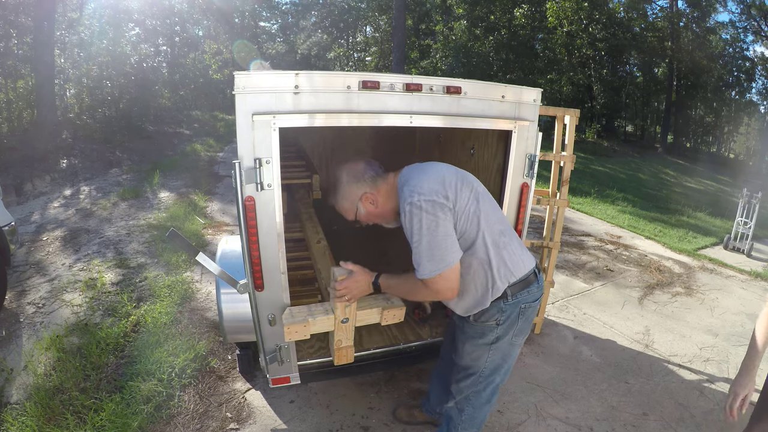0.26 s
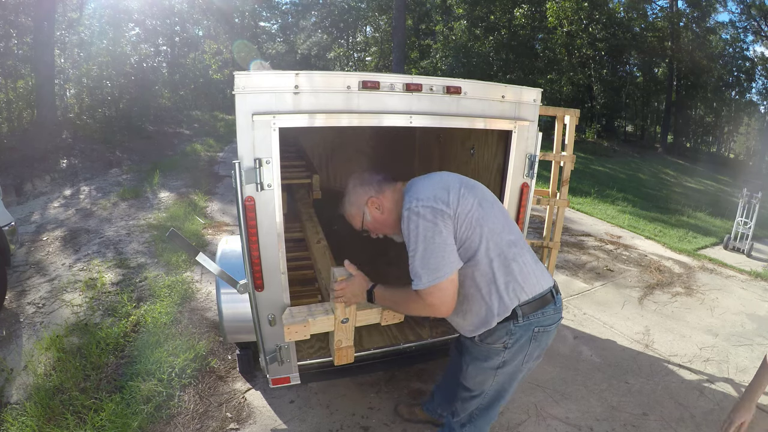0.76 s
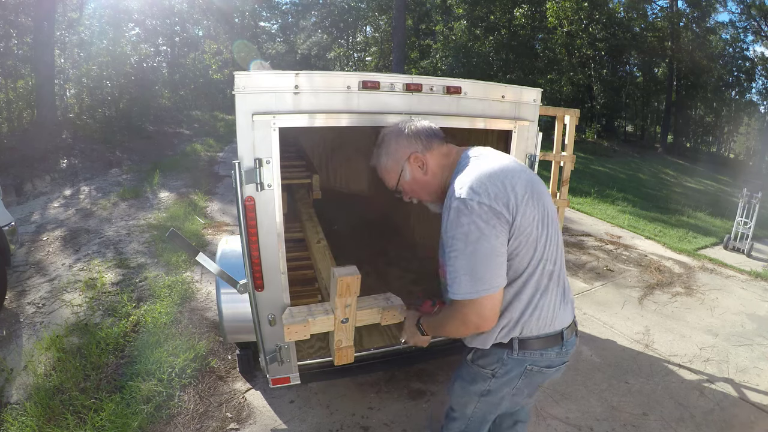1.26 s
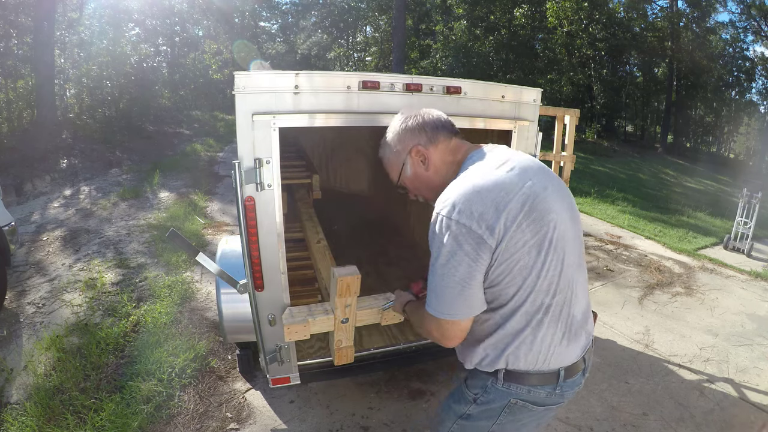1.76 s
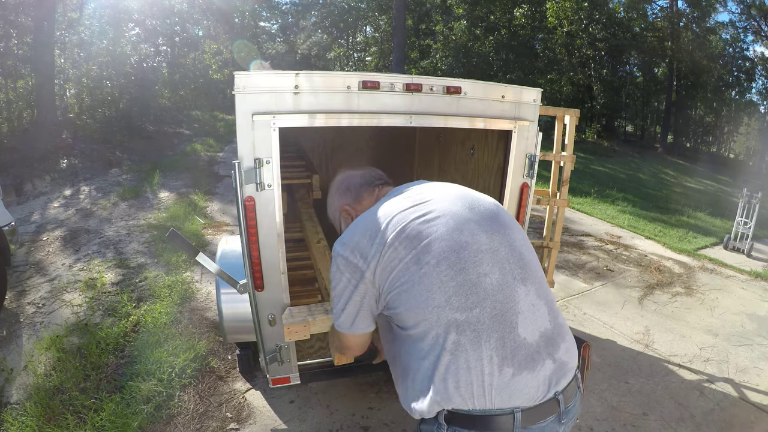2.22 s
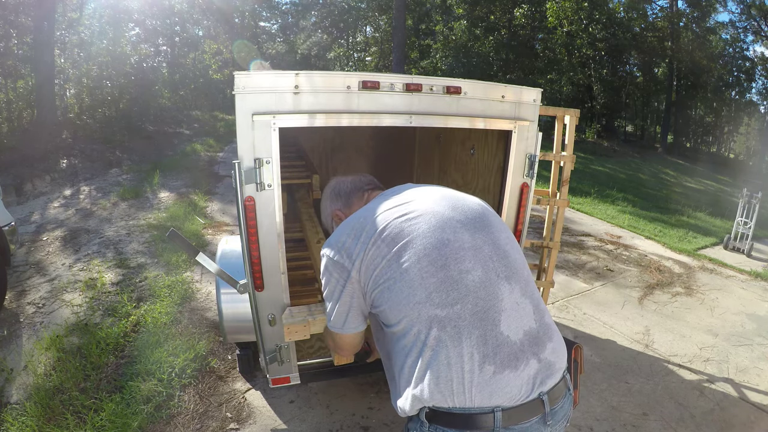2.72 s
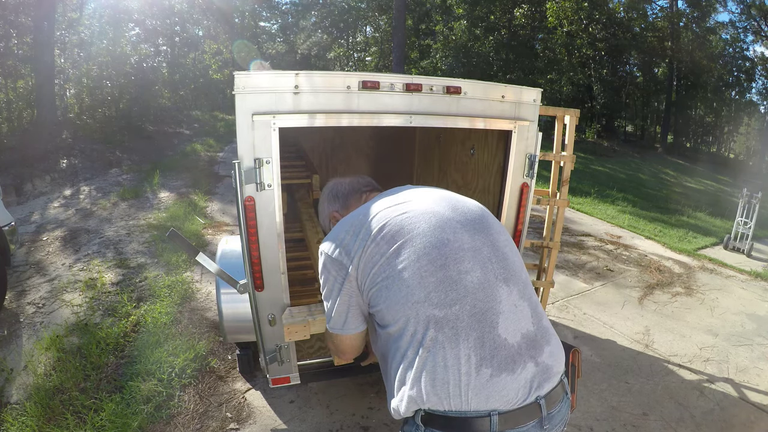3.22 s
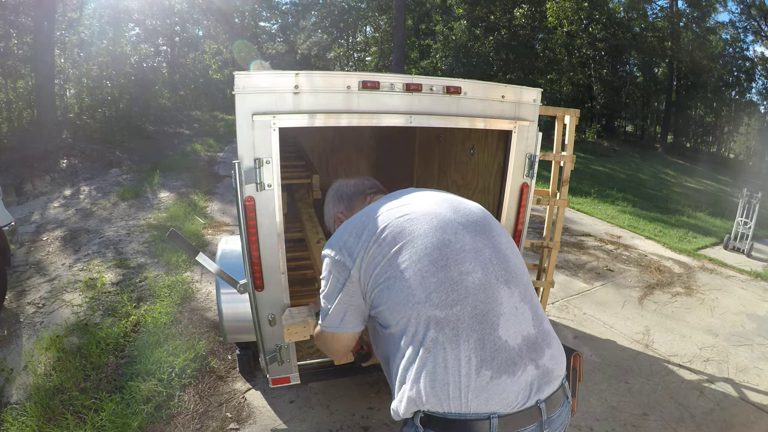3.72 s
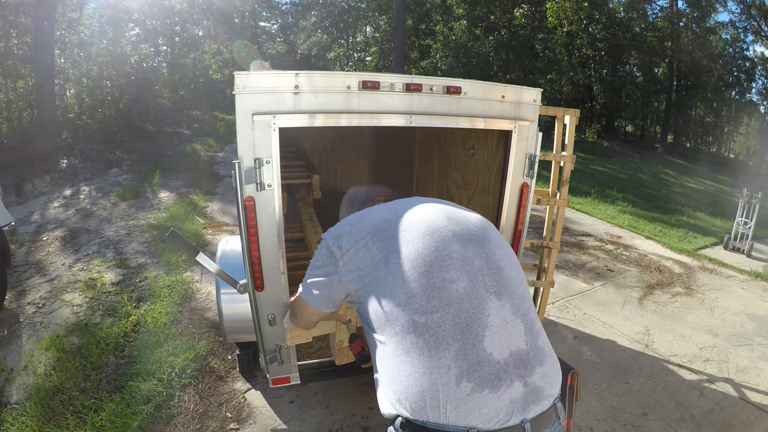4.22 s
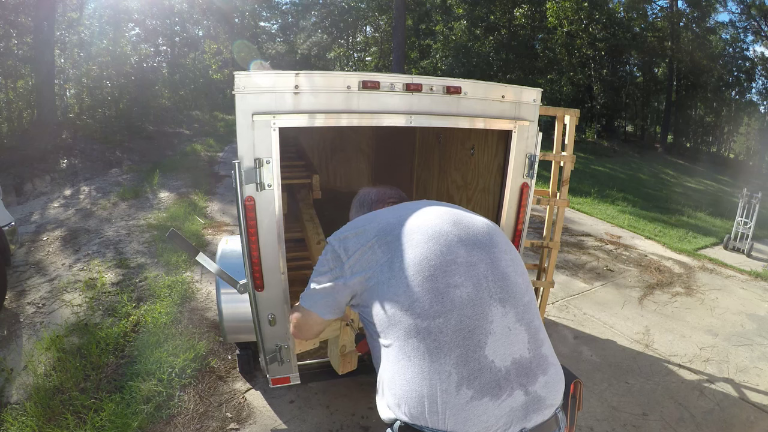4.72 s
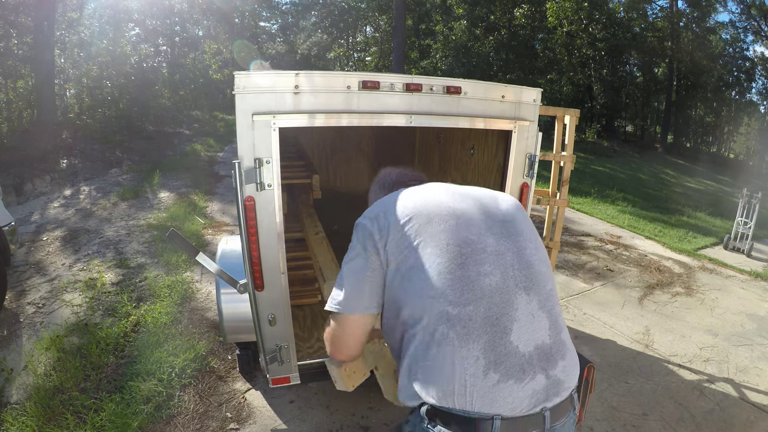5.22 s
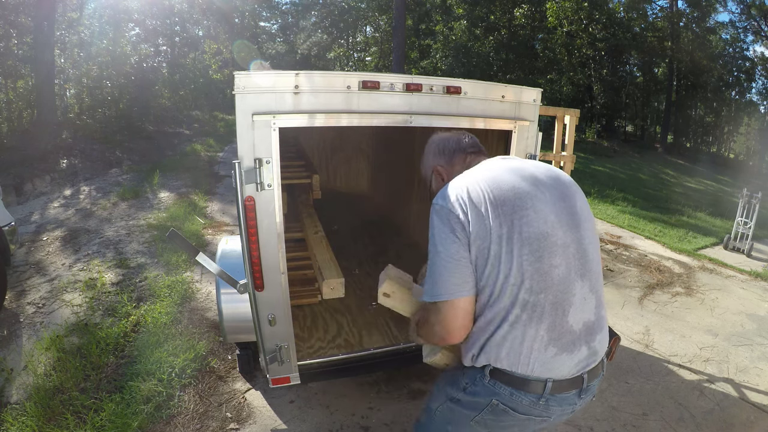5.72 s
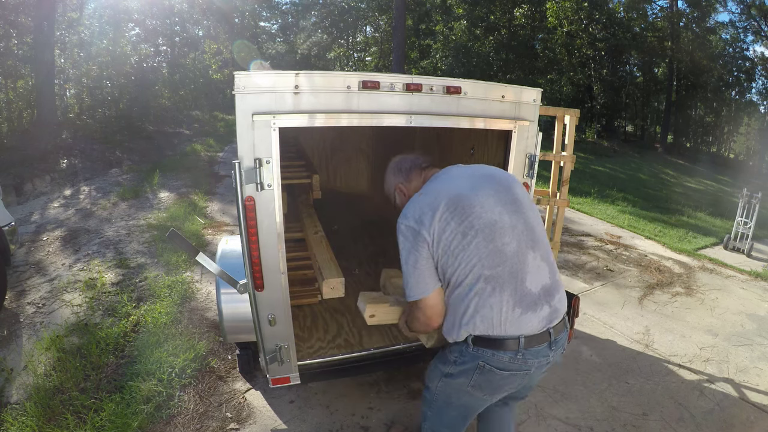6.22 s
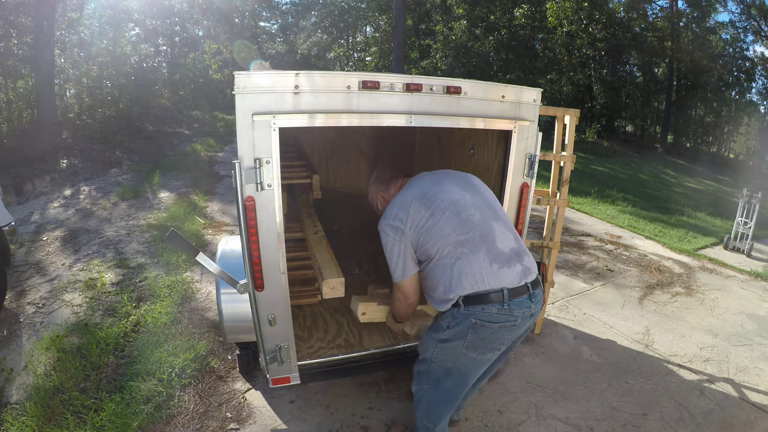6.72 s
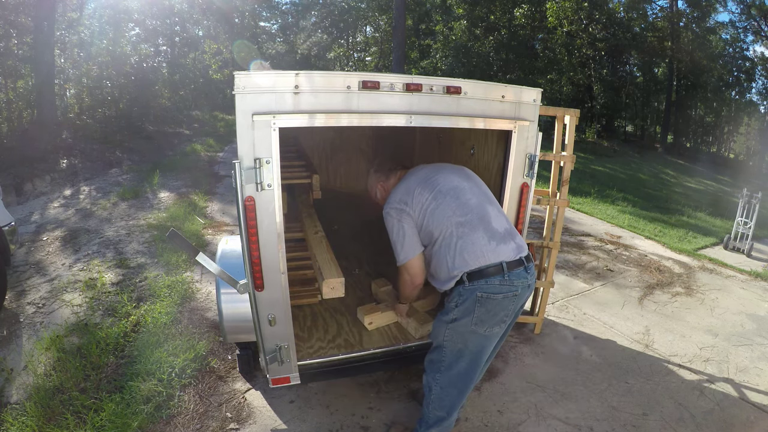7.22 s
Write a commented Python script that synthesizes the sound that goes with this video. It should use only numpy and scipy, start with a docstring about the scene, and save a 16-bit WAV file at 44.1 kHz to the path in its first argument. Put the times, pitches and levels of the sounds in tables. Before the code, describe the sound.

Wooden posts crack, scrape and squeal against a plywood trailer floor, with hollow booming thumps and one heavy final drop, outdoors with faint insects.

```python
"""Outdoors, at a small trailer: wooden posts are knocked, dragged and dropped on its plywood floor.
Clicks ring the box, floor and posts through decaying modes; noise bursts give cracks their scuff and clatter.
Clumpy noise makes the wood rasp, ring and groan, gliding partials make it squeal. Filtered noise gives
insects, yard, wind and the rocking trailer's rumble on a small camera, whose right microphone port is
far stronger than the left near 6 kHz; its limiter ducks under the thumps."""
import sys
import numpy as np
from scipy import signal
from scipy.fft import rfft, irfft
from scipy.io import wavfile
from scipy.ndimage import uniform_filter1d

SR = 44100
rng = np.random.default_rng(int(sys.argv[2]) if len(sys.argv) > 2 else 0)


def store_pcm(level_fs):
    """Save levels as 16-bit WAV."""
    pcm = np.round(np.clip(level_fs, -1, 1) * 32767).astype(np.int16)
    wavfile.write(sys.argv[1], SR, np.atleast_2d(pcm).T)


N = 329427
T = np.arange(N) / SR

# All levels are relative, ahead of the microphone ports and limiter.
# Modes of the plywood floor: f/Hz, level/dB, t60/s
PLYWOOD_MODES = [(140, 1, 0.2), (170, -5, 0.25), (189, -2.5, 0.3), (250, -2, 0.16), (285, -6, 0.25),
                 (314, -6, 0.17), (350, -4, 0.1), (415, -1, 0.14), (520, -5, 0.12)]
# Modes of a wooden post: f/Hz, level/dB, t60/s
POST_MODES = [(920, 2, 0.2), (943, -2, 0.16), (1050, -7, 0.12), (1335, -10, .14), (1430, -10, .15),
              (2452, -9, 0.24), (2508, -10, 0.24), (3420, -12, 0.12), (3640, -11, .14), (4750, -13, .14),
              (5330, -9, .16)]
# Spectrum of bright wood hiss: f/Hz, density/dB per Hz
HISS_SPECTRUM = [(1180, -16), (2000, -32), (2360, -14.5), (3600, -13), (5230, -5), (5640, 3), (6280, 1.5),
                 (8390, -23), (9660, -21), (11100, -36), (14500, -44)]
# Spectrum of lower, rasping friction: f/Hz, density/dB per Hz
RASP_SPECTRUM = [(250, 13.5), (450, 7.5), (1000, 1.5), (2000, 5), (3500, -5.5), (5000, -35)]
# Spectrum of a woody rap: f/Hz, density/dB per Hz
RAP_SPECTRUM = [(900, 6.5), (1300, 0), (2500, -5.5), (4500, -13.5), (6000, -6)]


def gain_of(db):
    """Amplitude factor of a level in dB."""
    return 10 ** (np.asarray(db) / 20)


def evened(x):
    """Scales to rms 1."""
    return x / np.sqrt(np.mean(x ** 2) + 1e-20)


def read(points, hz):
    """Reads a curve between its points on a logarithmic frequency axis."""
    f, value = np.transpose(points)
    return np.interp(np.log(hz + 1), np.log(f + 1), value)


def coloured(x, points):
    """Filters by a spectrum that closes at both ends; rms 1."""
    hz = np.fft.rfftfreq(x.shape[-1], 1 / SR)
    inside = (hz >= points[0][0]) & (hz <= points[-1][0])
    spectrum = rfft(x) * gain_of(read(points, hz)) * inside
    return evened(irfft(spectrum, x.shape[-1]))


def ring(modes):
    """Response to a click, peak 1; neighbours start in opposite phase, so close pairs swell and beat."""
    t = T[:SR]
    out = np.zeros(SR)
    for k, (hz, db, t60) in enumerate(modes):
        out += (-1) ** k * gain_of(db - 60 * t / t60) * np.sin(2 * np.pi * hz * t)
    return out / abs(out).max()


def through(x, response):
    """Passes both paths through one response."""
    return signal.oaconvolve(x, response[None], axes=1)[:, :N]


def resonate(x, hz, width):
    """Shifts hz down to zero, smooths twice for steep skirts, shifts back; rms 1."""
    turn = np.exp(2j * np.pi * np.cumsum(hz * np.ones(x.shape[-1])) / SR)
    narrow, wide = np.exp(-np.pi * width * np.array([1, 3.0]) / SR)
    smooth = signal.lfilter([1], np.convolve([1, -narrow], [1, -wide]), x / turn)
    return evened((turn * smooth).real)


def noise():
    """Two unrelated draws, one for each path to the microphone."""
    return rng.standard_normal((2, N))


def wander(size):
    """Slow random drift of rms 1: noise averaged twice over size samples."""
    return evened(uniform_filter1d(uniform_filter1d(rng.standard_normal(N), size), size))


def fall(s, db, rise, t60):
    """Envelope that swells with time constant rise and dies by t60, cut after a second."""
    out, u = np.zeros(N), T[:SR]
    part = out[round(s * SR):][:SR]
    part += (gain_of(db - 60 * u / t60) * (1 - np.exp(-u / rise)))[:len(part)]
    return out


def bursts(s, db, rise, t60):
    """Sum of the envelopes of all events."""
    return sum(map(fall, s, db, [rise] * len(s), t60))


def blows(s, db):
    """One click at each time, alike on both paths."""
    out = np.zeros((2, N))
    out[:, np.round(s * SR).astype(int)] = gain_of(db)
    return out


def curve(tables, column):
    """Level of one column over all strokes, silent between them."""
    out = np.zeros(N)
    for rows in tables:
        s, db = np.transpose(rows)[[0, column]]
        fade = np.clip(np.minimum(T - s[0], s[-1] - T) / 0.003, 0, 1)
        out += gain_of(np.interp(T, s, db)) * fade
    return out


def rumble():
    """Low lumpy noise: wind on the microphone, and the trailer rocking after heavy thumps."""
    # Course of the rumble: t/s, level/dB
    course = [(0.0, -31.5), (0.3, -28.5), (0.68, -39), (1.4, -40), (1.6, -46), (2.1, -54), (2.6, -49),
              (2.9, -66), (3.4, -56), (3.99, -37), (4.5, -35), (5.05, -41.5), (5.25, -36), (5.5, -25.5),
              (6.1, -38.5), (6.75, -45), (7.05, -28), (7.47, -46)]
    # Spectrum of the rumble: f/Hz, density/dB per Hz
    rumble_spectrum = [(12, -32), (30, -2), (60, -3), (100, -15), (200, -23.5), (400, -41.5)]
    s, db = np.transpose(course)
    lumps_db = 1.5 * wander(size=1500)
    return gain_of(np.interp(T, s, db) + lumps_db) * coloured(noise(), rumble_spectrum)


def yard():
    """Quiet wide-band air of the yard, swelling slightly."""
    # Spectrum of the air: f/Hz, density/dB per Hz
    yard_spectrum = [(53, -70), (90, -4), (211, 3.5), (316, -5.5), (382, -6.5), (537, -12), (610, -12.5),
                     (933, -15.5), (3340, -22), (7500, -15), (12500, -38), (14500, -58)]
    yard_db = -54
    swell_db = 1.2 * wander(size=4000)
    return gain_of(yard_db + swell_db) * coloured(noise(), yard_spectrum)


def insects():
    """Narrow shrill noise bands in the trees, throbbing together at a slightly uneven rate."""
    # Insect bands: f/Hz, width of the first smoothing/Hz, level/dB before the throb
    shrills = [(6780, 250, -69), (7340, 200, -63), (7590, 130, -61), (7770, 150, -63)]
    throb_hz = 45.8
    throb = 1 + .5 * np.sin(2 * np.pi * throb_hz * T + 0.63 * wander(size=4000))
    shrill = sum(gain_of(db) * resonate(noise(), hz, width) for hz, width, db in shrills)
    return throb * shrill


def thumps():
    """The box booms a moment after the blow, a rattle shakes the plywood; loose wood clatters, dulling."""
    # Drops: t/s, plywood/dB, boom/dB, board/dB, clatter/dB, dullness/dB per band up, base t60/s
    drops = [(0.153, -24.5, -15, -37, -29, 12, 0.52), (0.628, -31, -25.5, -44, -38.5, 15, 0.33),
             (0.653, -25.5, -41, -51, -38.5, 32, 0.26), (0.746, -27, -42, -42.5, -50, 30, 0.089),
             (1.823, -42.5, -56, -75, -73, 15, 0.043), (3.011, -48, -47, -45, -33.5, 8, 0.68),
             (4.49, -56, -46, -49, -33.5, 11, 0.11), (4.837, -31.5, -33.5, -45, -35, 11, 0.25),
             (5.174, -30.5, -11, -13, -15, 16.5, 0.38), (5.216, -21.5, -17, -19, -16, 11.5, 0.32),
             (5.466, -47, -42, -32.5, -27.5, 18, 0.3), (6.116, -67, -49, -72, -39, 32, 0.043),
             (6.583, -49, -48, -46, -45, 22, 0.23), (6.836, -18, -9, -45.5, -35.5, 27, 1),
             (7.145, -4, -2.5, -18, -14, 8.5, 0.36), (7.219, -19.5, -24, -32, -26, 15, 0.27)]
    # Modes of the trailer box: f/Hz, level/dB, t60/s
    box_modes = [(51.3, 6.5, 1.2), (63.2, 13.5, 0.89), (69.97, 24, 0.94), (83.3, 8.5, 0.66),
                 (96, 16.5, 0.82)]
    # Modes of a loose board: f/Hz, level/dB, t60/s
    board_modes = [(484, -3, .13), (538, 0, .18), (770, -4, .09), (880, -3, .1), (930, -3, .11),
                   (1030, -3, .1), (1450, -8, .07), (1760, -12, .12), (2073, -13, .1)]
    # Spectrum of the lowest clatter band: f/Hz, density/dB per Hz
    clatter_spectrum = [(150, 8.5), (250, 2.5), (361, -5.5), (541, -12.5), (671, -9.5), (928, -17.5),
                        (1140, -15.5), (1400, -26), (1820, -36), (3080, -120)]
    boom_delay_s = 0.012
    strike_db = -0.5  # first blow against the rattle that follows
    s, ply_db, boom_db, board_db, clatter_db, dull_db, t60 = np.transpose(drops)
    t60 = np.maximum(t60, .05)
    out = through(blows(s + boom_delay_s, boom_db), ring(box_modes))
    # (modes, levels, multiple of the base t60)
    for modes, db, lasting in ((PLYWOOD_MODES, ply_db, 1.29), (board_modes, board_db, .8)):
        body = ring(modes)
        rattle = noise() * bursts(s, db, .003, lasting * t60)
        out = out + through(rattle, body / np.linalg.norm(body))
        out = out + through(blows(s, db + strike_db), body)
    # (spectrum, rise in s, multiple of the base t60); the treble dies first
    bands = ((clatter_spectrum, .003, 1.4), (RAP_SPECTRUM, .002, 1.1), (HISS_SPECTRUM, .002, .9))
    for step, (colour, rise, lasting) in enumerate(bands):
        band_db = clatter_db - step * dull_db
        out = out + coloured(noise(), colour) * bursts(s, band_db, rise, lasting * t60)
    return out


def knocks():
    """Wood on wood: a sharp crack of three dying tones, a noisy scuff and woody rap; the post rings on."""
    # Knocks: t/s, crack/dB, scuff/dB, woody rap/dB, post ring/dB
    hits = [(0.3594, -30, -54, -83, -79), (0.5483, -28, -57, -80, -83), (0.561, -34, -43, -76, -78),
            (1.152, -35, -56, -42, -64), (1.598, -31, -49, -49, -71), (1.676, -14, -32, -58, -65),
            (1.699, -27, -76, -78, -72), (1.7737, -31, -52, -78, -74), (1.847, -51, -49.5, -56, -72),
            (2.3855, -18, -31, -35.5, -25), (2.511, -43, -43, -46, -45), (2.5511, -17.5, -39, -48, -39),
            (2.911, -29, -45, -78, -75), (2.9762, -19, -29.5, -39, -42), (3.007, -15.5, -49, -46, -42),
            (3.0443, -11, -30, -63, -65), (3.109, -26, -31.5, -39.5, -35.5), (3.2035, -22.5, -50, -49, -65),
            (3.3756, -7, -28.5, -53, -56), (3.3786, -22, -44, -53, -44), (3.4045, -18, -41, -48, -59),
            (4.6031, -25, -45, -48, -55), (4.933, -26, -50, -45, -41.5), (5.1753, -27, -43, -20.5, -30),
            (5.5, -37, -57, -69, -81), (5.55, -34, -53.5, -56, -75), (5.701, -38, -45.5, -53.5, -74.5),
            (6.1375, -35, -49.5, -64, -73), (6.3425, -45, -43, -60, -65), (6.5932, -26, -31.5, -72, -77),
            (6.8587, -25, -44, -36, -76), (7.088, -23, -37.5, -47, -71)]
    s, crack_db, scuff_db, rap_db, ring_db = np.transpose(hits)
    rise_s, t60 = .0006, [0.24] * len(s)
    t = T[:400]
    snap = np.zeros(len(t))
    for hz, db in ((2600, -10.0), (3800, -1.5), (5300, 7)):
        snap += gain_of(db - 60 * t / 0.0033) * np.sin(2 * np.pi * hz * t)
    snap = snap * (1 - np.exp(-t / 0.00077))
    crack = through(blows(s, crack_db), snap)
    scuff = coloured(noise(), HISS_SPECTRUM) * bursts(s, scuff_db, rise_s, t60)
    rap = coloured(noise(), RAP_SPECTRUM) * bursts(s, rap_db, rise_s, t60)
    return crack + scuff + rap + through(blows(s, ring_db), ring(POST_MODES))


def friction_grit():
    """Noise in fine and coarse clumps, as fibres catch: the raw material of all the rubbing."""
    return evened(noise() * gain_of(0.31 * wander(size=40) + 1.35 * wander(size=600)))


def brushes(grit):
    """Brief brushes of wood, cloth and sole: bell-shaped swells of hiss with rasp under it."""
    # Brushes: t of the top/s, rise/s, fall/s (both to 1/e), hiss level/dB
    swells = [(.59, 0.046, 0.31, -51), (.87, 0.021, 0.034, -49.5), (0.942, 0.036, 0.025, -38.5),
              (1.198, 0.039, 0.05, -29), (1.428, 0.27, 0.1, -53.5), (2.269, 0.067, 0.072, -44),
              (5.785, 0.05, 0.03, -49.5), (6.24, 0.048, 0.09, -51), (6.602, 0.016, 0.036, -37.5),
              (6.9, 0.063, 0.082, -44), (7.1, 0.094, 0.21, -44.5)]
    rasp_db = -6.5  # against the hiss
    level = np.zeros(N)
    for s, rise, drop, db in swells:
        level += gain_of(db) * np.exp(-((T - s) / np.where(T < s, rise, drop)) ** 2)
    hiss = coloured(grit, HISS_SPECTRUM)
    return level * (hiss + gain_of(rasp_db) * coloured(grit, RASP_SPECTRUM))


def rings_and_groans(grit):
    """Stuttering grit in one gliding resonance: brief rings, groans and squeaks, starting fast and weakening."""
    # Rings, groans and squeaks: start t/s, end t/s, start f/Hz, end f/Hz,
    # width of the first smoothing/Hz, start level/dB
    glides = [(1.67, 1.76, 3240, 2900, 1080, -43.5), (2.912, 2.982, 2650, 2650, 450, -46.5),
              (0.64, 0.67, 815, 830, 100, -44), (4.333, 4.45, 930, 910, 49.4, -44.5),
              (4.399, 4.5, 1220, 1230, 149, -43.5), (4.465, 5.045, 1015, 1020, 109, -51),
              (4.619, 4.84, 2075, 2100, 35, -50), (5.467, 5.502, 846, 820, 120, -29.5),
              (7.073, 7.145, 4370, 4400, 40, -48), (7.081, 7.155, 1520, 1550, 35, -51)]
    fade_db, rise_s, end_s = -5, .002, .02
    out = np.zeros((2, N))
    stutter = grit * gain_of(3.5 * wander(size=150))
    for start, end, start_hz, end_hz, width, db in glides:
        span = slice(round(start * SR), round(end * SR))
        t = T[span]
        pitch = np.interp(t, (start, end), (start_hz, end_hz))
        level = gain_of(np.linspace(db, db + fade_db, len(pitch)))
        edges = np.clip(np.minimum((t - start) / rise_s, (end - t) / end_s), 0, 1)
        out[:, span] += level * edges * resonate(stutter[:, span], pitch, width)
    return out


def strands(grit, count):
    """Many fibres sing faintly at once, drifting together in pitch, each breaking off on its own."""
    low_hz, high_hz, width_hz, break_db = 1500, 5400, 70, 4
    drift = 1 + .022 * wander(size=4000)
    out = np.zeros((2, N))
    for hz in np.geomspace(low_hz, high_hz, count):
        out += gain_of(break_db * wander(size=1200)) * resonate(grit, hz * drift, width_hz)
    return evened(out)


def strokes(grit):
    """Dragging: grit hisses and rasps, and drives the post to sing while noise makes the plywood drone."""
    # One list a stroke: t/s, scrape/dB, post singing/dB, floor droning/dB
    drags = [
        [(2.39, -55, -39.5, -31), (2.63, -50, -57, -46.5), (2.74, -71, -74, -46)],
        [(2.975, -45, -30.5, -69), (3.015, -39.5, -44, -38.5), (3.21, -48, -48, -29.5), (3.35, -85, -102, -49)],
        [(3.358, -39, -48, -51), (3.38, -46, -54, -33.5), (3.5, -40, -53, -40), (4.1, -45, -66, -45.5),
         (4.3, -45, -63, -51.5), (4.49, -46.5, -40.5, -48), (4.55, -44.5, -62, -55), (4.9, -43.5, -60, -44),
         (4.98, -52.5, -59, -41), (5.06, -70, -68, -60)],
    ]
    rasp_db, strands_db = -5, -7  # against the scrape's hiss
    edge_hz, edge_width_hz, edge_db = 2500, 350, -11  # rough band in the last, long scrape
    scrape = curve(drags, column=1)
    hiss = coloured(grit, HISS_SPECTRUM)
    rasp = gain_of(rasp_db) * coloured(grit, RASP_SPECTRUM)
    fibres = gain_of(strands_db) * strands(grit, count=18)
    uneven_grit = grit * gain_of(8.0 * wander(size=500))
    post = curve(drags, column=2) * evened(through(uneven_grit, ring(POST_MODES)))
    drone = curve(drags, column=3) * evened(through(noise(), ring(PLYWOOD_MODES[1:4])))
    edge = gain_of(edge_db) * curve(drags[2:], column=1) * resonate(grit, edge_hz, edge_width_hz)
    return scrape * (hiss + rasp + fibres) + post + drone + edge


def squeals():
    """The dragged edge catches again and again: a few partials squeak in wavering, fluttering glides."""
    # Squeals: start t/s, end t/s, start f/Hz, end f/Hz, level of the lowest partial/dB before flutter
    catches = [(3.435, 3.47, 2300, 2580, -45), (3.455, 3.6, 2580, 2420, -43), (3.5, 3.69, 2420, 2310, -44),
               (3.765, 3.83, 2520, 2420, -48), (3.785, 3.92, 2780, 2810, -50),
               (3.88, 3.93, 2200, 2230, -46), (3.915, 3.965, 2350, 2510, -45),
               (4.005, 4.045, 2470, 2550, -42), (4.04, 4.2, 2340, 2370, -51), (4.195, 4.3, 2480, 2630, -45),
               (4.285, 4.33, 2350, 2520, -47), (4.38, 4.56, 2460, 2620, -51),
               (4.59, 4.665, 2360, 2620, -45), (4.65, 4.885, 2640, 2520, -47),
               (4.865, 4.945, 2850, 2600, -51)]
    # Partials: multiple of the pitch, level/dB
    partials = [(1, 0), (1.23, -12), (1.4, -15), (1.82, -12)]
    out = np.zeros((2, N))
    flutter = gain_of(3 * wander(size=400))
    waver = 1 + .009 * wander(size=160)
    for start, end, start_hz, end_hz, db in catches:
        span = slice(round(start * SR), round(end * SR))
        pitch = np.interp(T[span], (start, end), (start_hz, end_hz))
        phase = 2 * np.pi * np.cumsum(pitch * waver[span]) / SR
        tone = sum(gain_of(part_db) * np.sin(times * phase) for times, part_db in partials)
        out[:, span] += gain_of(db) * signal.windows.tukey(len(pitch), .25) * flutter[span] * tone
    return out


def scene():
    """Adds the low and outdoor bed, the blows and the rubbing, which shares one grit."""
    grit = friction_grit()
    bed = rumble() + yard() + insects()
    rubbing = brushes(grit) + rings_and_groans(grit) + strokes(grit) + squeals()
    return bed + thumps() + knocks() + rubbing


def two_ports(dry):
    """Ports that share the bass and part in the treble; their sum keeps the tone of the scene."""
    # Likeness of the ports: f/Hz, likeness (0 to 1)
    likeness = [(60, 1), (250, 0.99), (400, 0.92), (600, 0.88), (1400, 0.86), (2200, 0.68), (4300, 0.56),
                (5500, 0.5), (8000, 0.12), (12000, 0.7)]
    # Lead of the left port: f/Hz, phase/rad
    left_lead = [(60, -.06), (150, -.16), (300, -.35), (550, -.75), (640, 2.2), (1500, 2), (1800, 1.1),
                 (4500, .7), (5800, .6), (7400, -2.8), (10500, -3), (11500, 0)]
    # Left port against right: f/Hz, level/dB
    left_minus_right = [(100, 1.1), (400, -2), (600, 2), (800, -1), (3000, -1), (4200, -4), (5000, -15.5),
                        (5900, -21), (6800, -13), (7600, -4), (14000, 2)]
    hz = np.fft.rfftfreq(N, 1 / SR)
    a, b = rfft(dry)
    same = np.clip(read(likeness, hz), 0, 1)
    lead = read(left_lead, hz)
    left_gain = gain_of(read(left_minus_right, hz))
    both = np.sqrt(left_gain ** 2 + 1 + 2 * same * left_gain * np.cos(lead)) / 2  # gain of the sum
    left = left_gain * a * np.exp(1j * lead)
    right = same * a + np.sqrt(1 - same ** 2) * b
    return irfft([left / both, right / both], N)


def limited(ports):
    """Turns both ports down by about half the excess dB, lets go slowly and rounds the highest peaks."""
    threshold_db, share = -19.0, 0.51
    power_db = 10 * np.log10(abs(uniform_filter1d((ports ** 2).mean(0), 500)) + 1e-12)
    recover = T * 18.  # the held level sinks 18 dB a second
    held_db = np.maximum.accumulate(power_db + recover) - recover
    over_db = np.maximum(held_db - threshold_db, 0)
    ducked = ports / gain_of(share * uniform_filter1d(over_db, 150))
    return .5 * np.tanh(ducked / .5)


def record(dry):
    """The camera: two ports, a limiter, then a steep low-pass."""
    low_pass = signal.firwin(511, 14700, window=("kaiser", 9), fs=SR)
    return signal.oaconvolve(limited(two_ports(dry)), low_pass[None], "same")


dry = scene()
out = record(dry)
store_pcm(out)
```